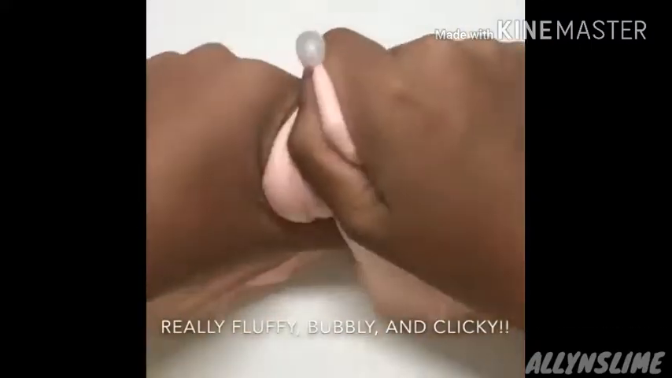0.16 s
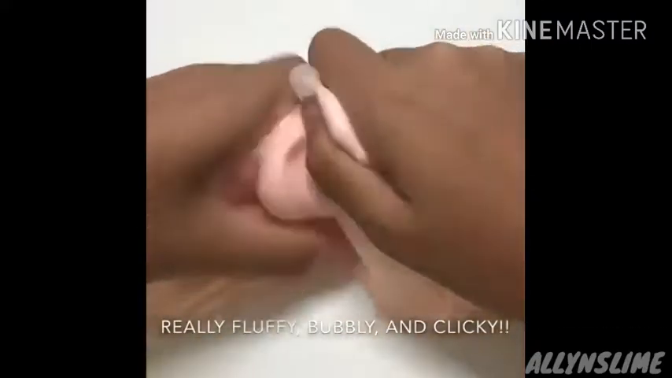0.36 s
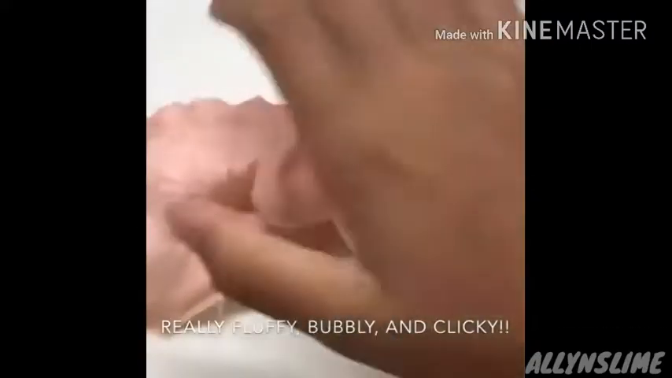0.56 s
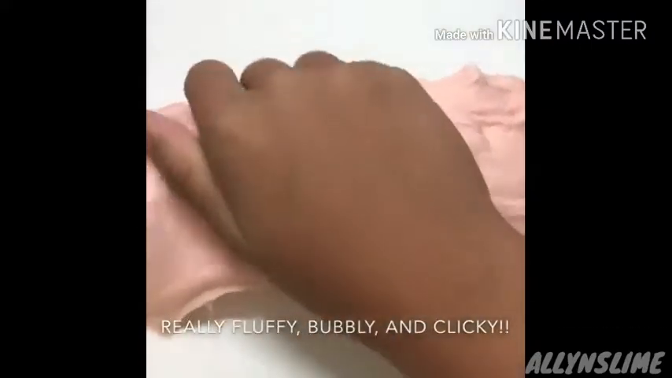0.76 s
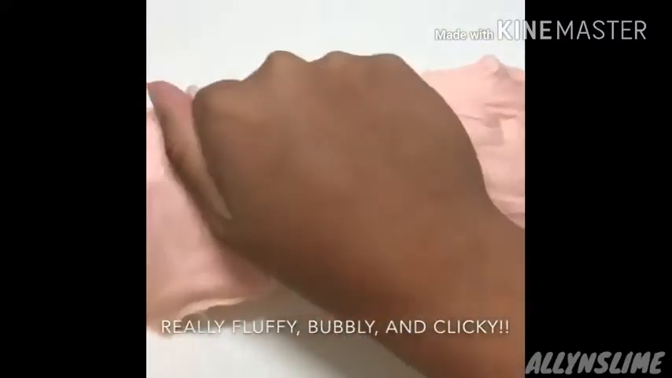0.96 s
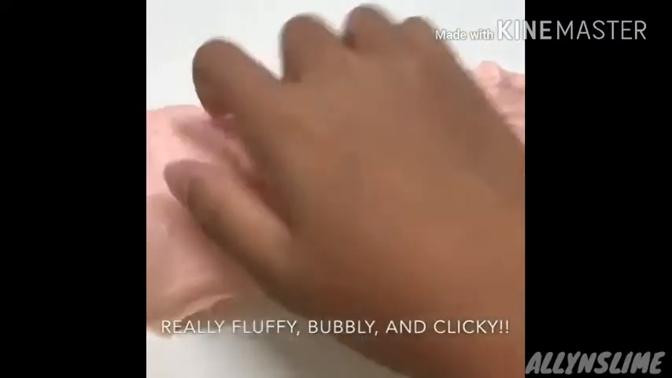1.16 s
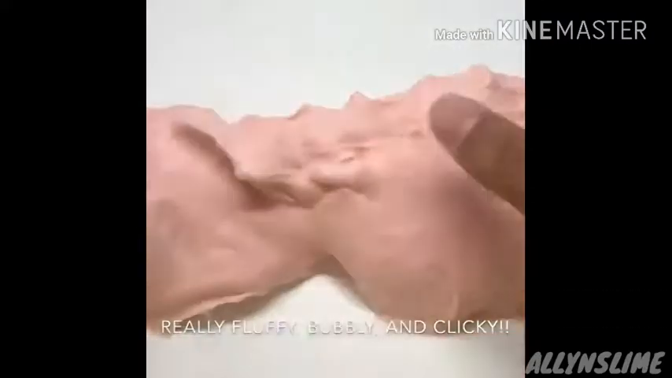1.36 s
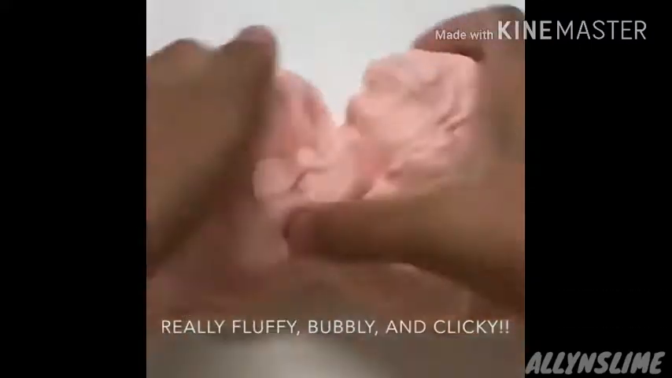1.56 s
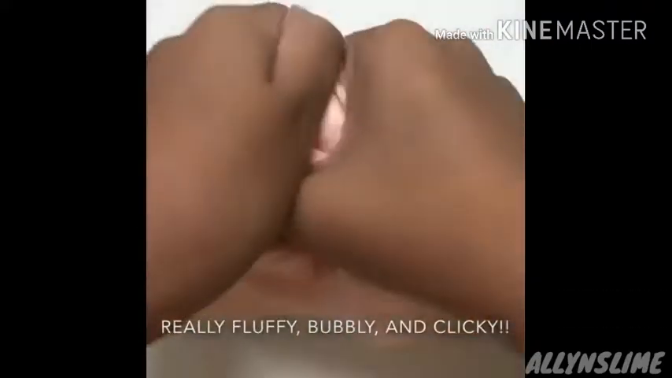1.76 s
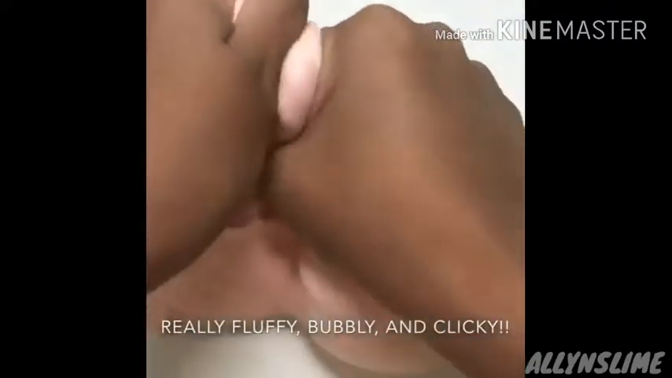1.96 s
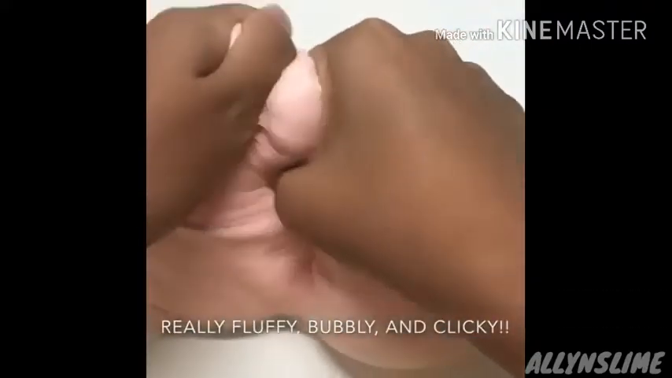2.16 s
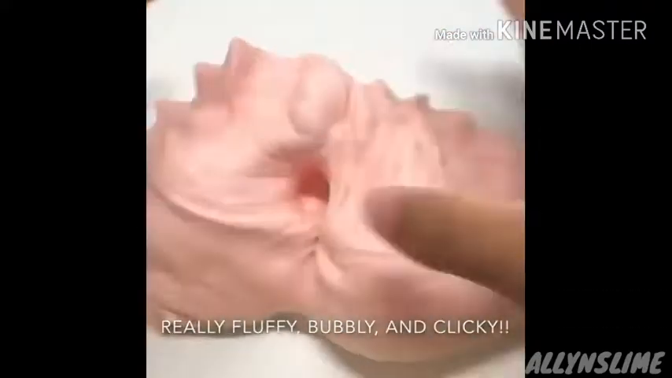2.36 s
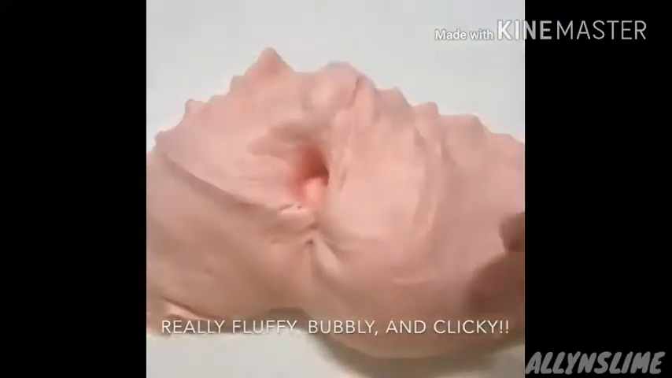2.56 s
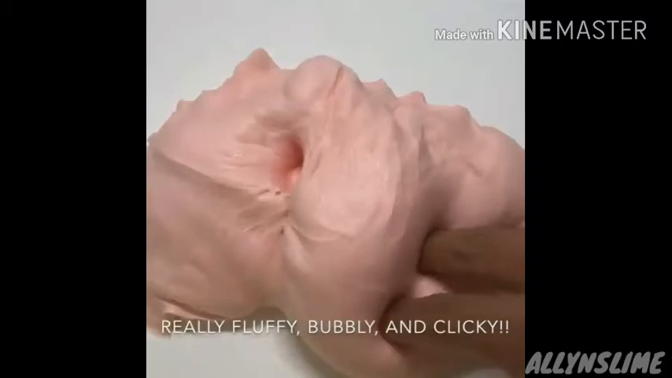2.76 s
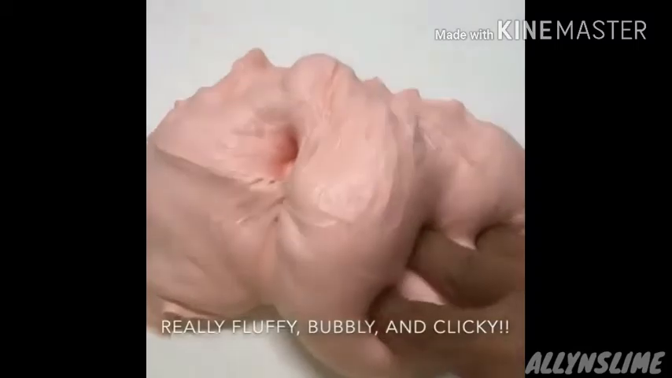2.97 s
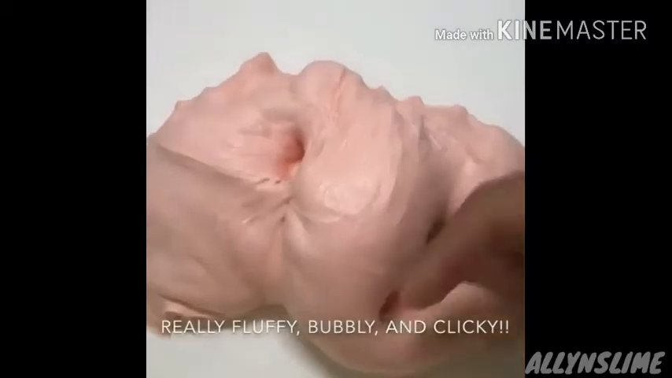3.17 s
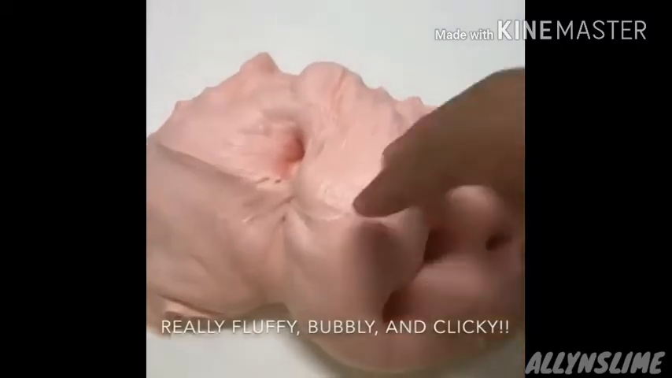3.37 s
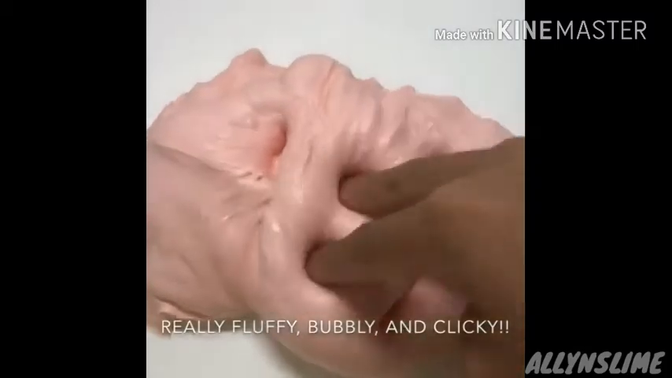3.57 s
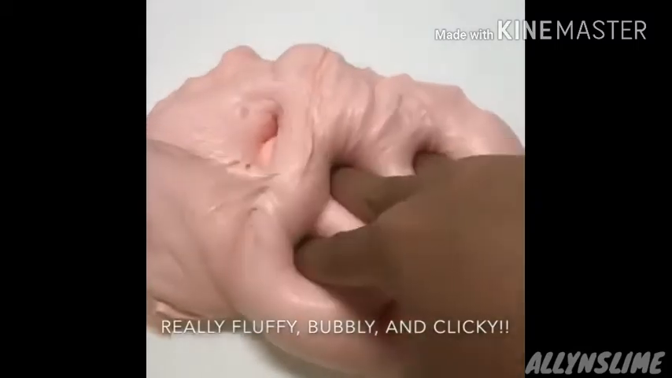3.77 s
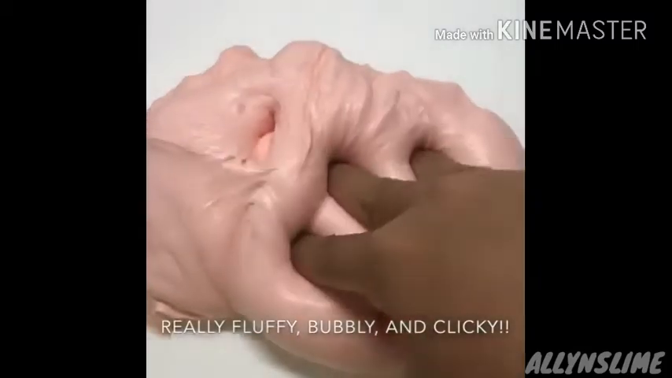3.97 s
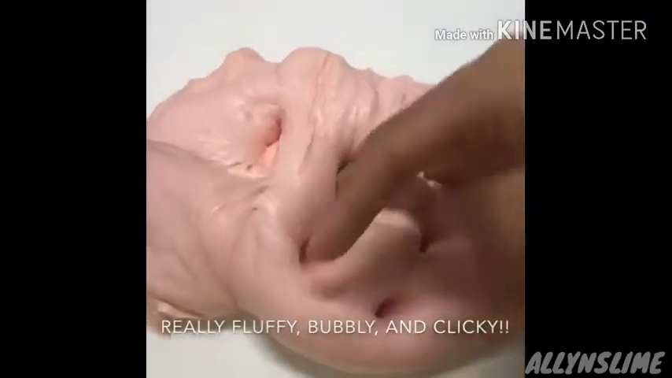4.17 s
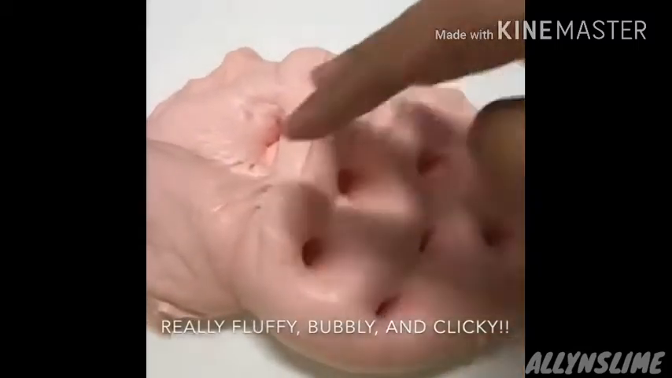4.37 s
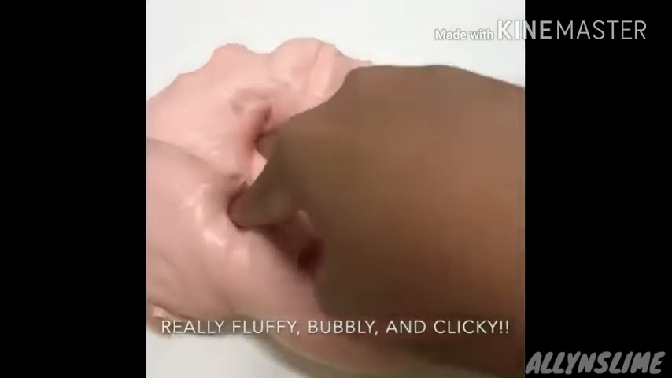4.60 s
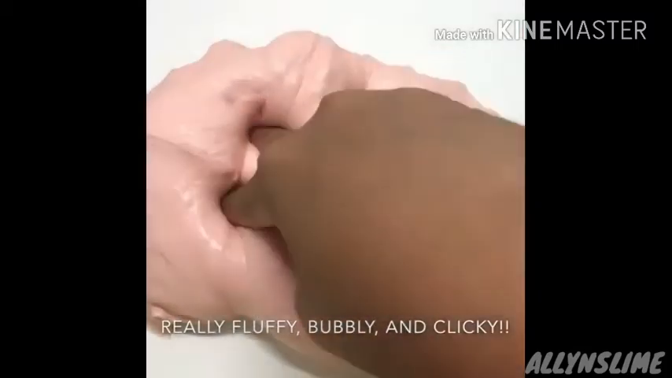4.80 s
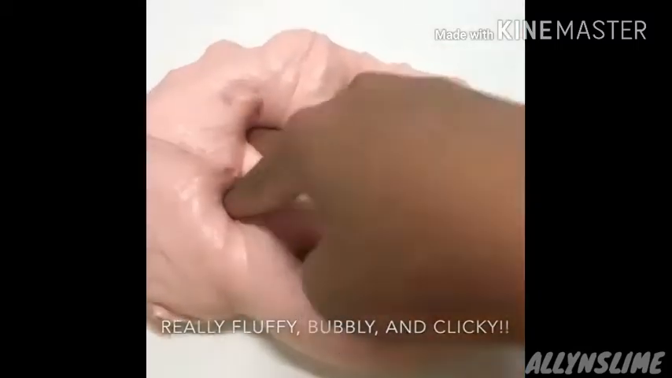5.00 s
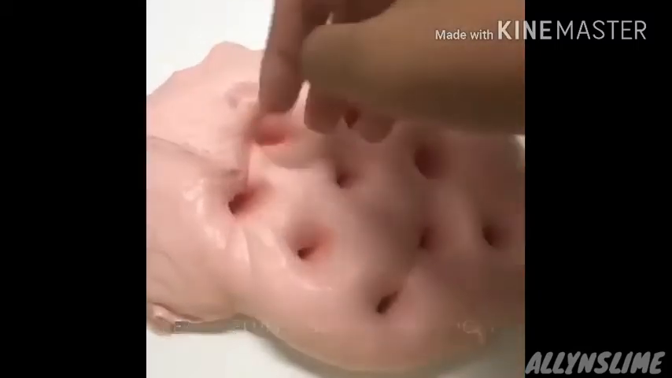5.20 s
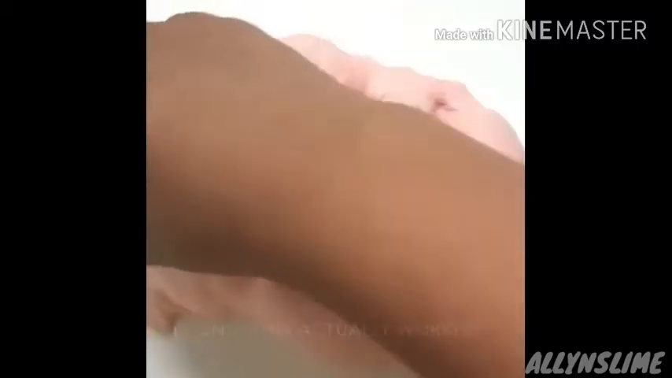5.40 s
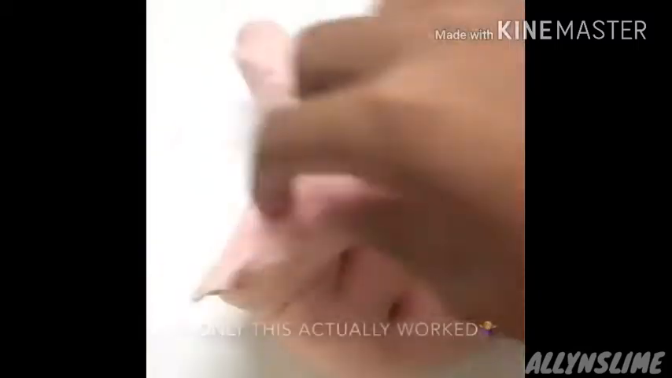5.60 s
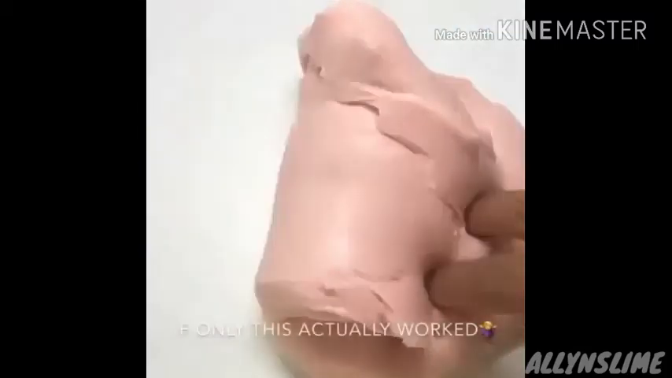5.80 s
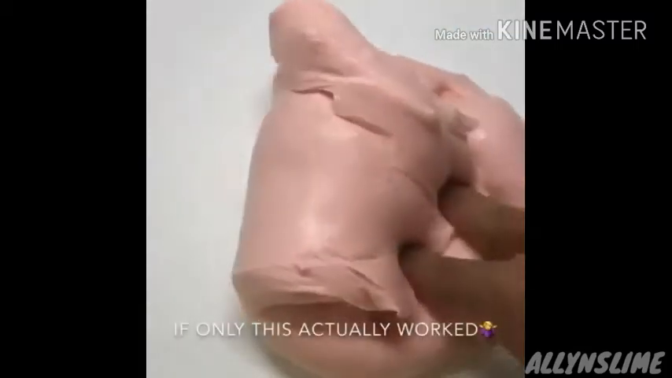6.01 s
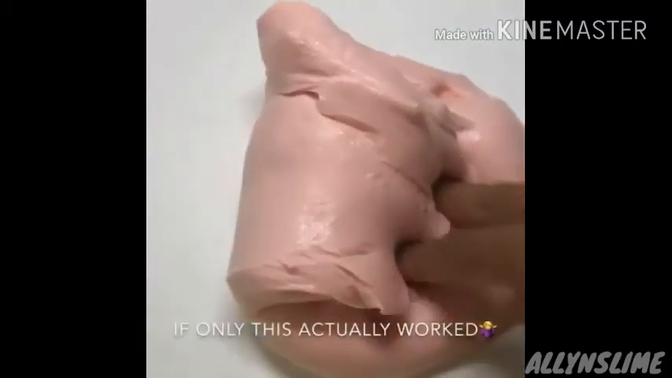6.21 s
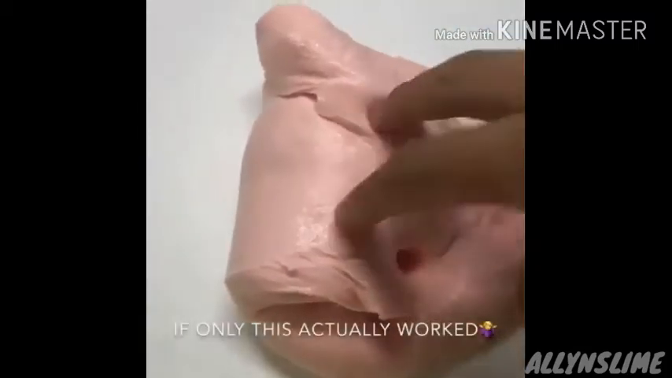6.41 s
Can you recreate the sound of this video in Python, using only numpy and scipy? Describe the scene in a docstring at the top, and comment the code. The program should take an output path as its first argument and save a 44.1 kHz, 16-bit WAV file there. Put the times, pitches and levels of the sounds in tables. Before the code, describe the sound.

Hands work foamy slime on a table, close to a small microphone in a quiet room with faint hiss. Soft fizzing and wet squelching swell with every touch. A few small pops come around 0.2 seconds, then a crackly squeeze near 0.6. Sharp, loud bubble snaps land at 1.0 and 1.1 seconds, followed by a softer squish. A quick run of pops fills 1.9 to 2.3 seconds, strongest near 2.15, and a fizzy squelch follows at 2.4. After a lull, fingers poke the slime: three crisp pops around 3.3 to 3.4, rounder plops at 4.3 with a soft table bump, and more at 5.2 to 5.4, each group trailed by a tiny gurgle as the holes close. Faint crackling continues until a last plop, low bump and short gurgle at about 6.4 seconds.

```python
"""Soft fizzing and squelching dotted with sharp little pops: hands squeeze, fold and poke a heap of foamy
slime on a table, close to a small microphone in a quiet room. Tiny foam cells crackle and wet folds slip
over each other, swelling with every touch. Trapped air pockets burst with a snap and a short ring, finger
holes plop as they open and gurgle as they close, and now and then the heap softly bumps the table."""
import sys
import numpy as np
from scipy import signal
from scipy.fft import rfft, irfft
from scipy.io import wavfile
from scipy.ndimage import uniform_filter1d

SR = 44100
rng = np.random.default_rng(int(sys.argv[2]) if len(sys.argv) > 2 else 0)


def dump_mix(stems):
    """Bounce the given channels to the path in sys.argv[1] as a 16-bit WAV at rate SR."""
    frames = np.atleast_2d(stems).T  # one column per channel
    limited = np.clip(frames, -1, 1)  # hard clip at full scale
    pcm = np.round(limited * 32767).astype(np.int16)
    wavfile.write(sys.argv[1], SR, pcm)


N = 284445


def gain_of(db):
    """Decibels to an amplitude factor."""
    return 10 ** (np.asarray(db) / 20)


def unit_rms(x):
    """Scales a signal to rms 1."""
    return x / np.sqrt(np.mean(x ** 2) + 1e-20)


def curve_at(points, hz):
    """Reads a curve of (Hz, value) points on a log-frequency axis."""
    point_hz, value = np.transpose(points)
    return np.interp(np.log(hz + 1), np.log(point_hz + 1), value)


def coloured(x, eq):
    """Shapes x with an EQ curve, at rms 1. Each row of eq: frequency in Hz, relative level in dB."""
    gains = gain_of(curve_at(eq, np.fft.rfftfreq(len(x), 1 / SR)))
    return unit_rms(irfft(rfft(x) * gains, len(x)))


def add(mix, start_s, sound):
    """Mixes a sound in at start_s."""
    part = mix[round(start_s * SR):][:len(sound)]
    part += sound[:len(part)]


def resonate(x, hz, width_hz):
    """A moving resonance: shifts the pitch curve hz down to zero, smooths, and shifts back."""
    carrier = np.exp(2j * np.pi * np.cumsum(hz) / SR)
    pole = np.exp(-np.pi * width_hz / SR)
    return 2 * (carrier * signal.lfilter([1 - pole], [1, -pole], x / carrier)).real


def grains(per_s, spread_db):
    """Random train of tiny clicks, most small and a few large."""
    size = gain_of(spread_db * np.minimum(rng.exponential(1, N), 5)) * rng.standard_normal(N)
    return size * (rng.random(N) < per_s / SR)


def burst(t, rise_s, t60):
    """Envelope that swells ever faster to a sharp peak of 1, then falls 60 dB in t60 seconds."""
    return np.where(t < rise_s, np.minimum(t / rise_s, 1) ** 2.5, gain_of(-60 * (t - rise_s) / t60))


def room_tone():
    """Steady hiss of room and microphone, with a faint mains buzz."""
    # Colour of the hiss. Each row: frequency in Hz, relative level in dB.
    hiss_eq = [(20, -31.5), (60, -10.5), (120, 0), (300, -16), (630, -3.5), (1200, -5.5), (2500, -4.5),
               (5000, -7), (6300, -11.5), (8000, -29.5), (10000, -39.5)]
    # Partials of the buzz. Each row: frequency in Hz, rms level in dB.
    mains_partials = [(50, -90), (150, -86), (250, -82.5), (500, -88), (700, -86), (900, -91),
                      (1150, -91.5), (1500, -84.5)]
    t = np.arange(N) / SR
    buzz = sum(gain_of(db) * np.sqrt(2) * np.sin(2 * np.pi * (hz * t + rng.random()))
               for hz, db in mains_partials)
    return gain_of(-70.5) * coloured(rng.standard_normal(N), hiss_eq) + buzz


def kneading():
    """Envelopes of small cells, large cells and wet folds: the settling and every crush add in power."""
    # The heap settling between touches. Each row: time in seconds, fizz in dB, squelch in dB.
    settling = [(0, -56.5, -71), (.1, -66, -68), (.5, -67, -72), (.93, -76, -77), (1.3, -71, -63.5),
                (1.55, -65.5, -71), (1.92, -74, -69.5), (2.58, -60, -63.5), (2.83, -80, -79),
                (2.9, -71.5, -72.5), (2.969, -85, -75), (3.1, -87, -82), (3.15, -76, -74),
                (3.5, -64.5, -76), (3.62, -68.5, -72), (3.72, -66, -74), (3.78, -76, -79), (3.93, -87, -80),
                (4.02, -72.5, -79), (4.119, -82, -80), (4.501, -68, -71.5), (5.151, -80, -82),
                (5.42, -71.5, -74.5), (5.52, -75, -72), (5.949, -74.5, -76), (6.17, -75, -75),
                (6.27, -84, -77.5), (6.45, -73, -79)]
    # Foam giving way under a finger or round a burst pocket. Each row: peak time, rise and hold in
    # seconds, fall in dB per second, fizz and squelch in dB, brightness (small over large cells) in dB.
    crushes = [(0.162, .012, 0.0055, 699, -48, -58, -2.5), (.247, .01, .002, 578, -36, -43.5, -11.5),
               (.29, .015, .02, 234, -52, -63, -2.5), (.338, 0.055, .006, 401, -47.5, -58, -2.5),
               (.585, .09, 0.025, 172, -37, -44, 0), (.76, .1, .05, 401, -63.5, -71, 1.5),
               (1.046, 0.036, .03, 249.5, -45, -55.5, -7.5), (1.122, 0.077, .01, 298.5, -43, -60, 3.5),
               (1.138, .015, 0.0022, 194, -31.5, -46, 3.1), (1.337, .06, .03, 390.5, -42, -46.5, -5),
               (1.68, .3, .085, 111, -54, -63, -1.7), (1.941, .015, .002, 39, -56, -58.5, 4),
               (2.062, .01, .002, 260, -31.5, -48.5, 9), (2.163, .03, .002, 149.5, -35.5, -43.5, -2),
               (2.365, .04, .015, 297.5, -53, -62, -4.5), (2.409, .07, 0.077, 255, -41.5, -46.5, -0.5),
               (3.321, .015, .002, 330, -37.5, -41.5, 14), (3.4, .03, .005, 172, -51, -50.5, -7),
               (4.302, .012, 0.0022, 647, -41.5, -41, -3.5), (4.354, .02, 0.0018, 189, -45.5, -46.5, -2.5),
               (4.45, .06, .01, 201.5, -57.5, -64.5, 4), (4.725, .04, .002, 250.5, -56.5, -57, -9.5),
               (4.846, .15, .002, 78.5, -60, -65, -4.5), (5.25, .012, .002, 700, -47, -36, 6),
               (5.29, .06, .002, 108.5, -48, -50, 1), (5.355, .02, 0.0018, 230.5, -53.5, -74, -8),
               (5.575, .04, 0.014, 100, -63, -63.5, 7.5), (5.68, .1, .025, 148.5, -55, -64, -1),
               (5.8, .15, .03, 110.5, -61.5, -68.5, 3.5), (6.381, .02, .03, 52.5, -51.5, -73, 2),
               (6.449, .1, .002, 100, -50.5, -46, -15)]
    t = np.arange(0, N + 20, 20) / SR
    settle_bright_db, climb_db = -.5, 30
    times, fizz_db, squelch_db = np.transpose(settling)
    layers = [(np.interp(t, times, fizz_db), np.interp(t, times, squelch_db), settle_bright_db)]
    for peak_s, rise_s, hold_s, fall_db_per_s, fizz_db, squelch_db, bright_db in crushes:
        attack_db = climb_db * np.minimum((t - peak_s) / rise_s, 0)
        shape_db = attack_db - fall_db_per_s * np.maximum(t - peak_s - hold_s, 0)
        layers.append((fizz_db + shape_db, squelch_db + shape_db, bright_db))
    small, large, folds = np.zeros((3, len(t)))
    for fizz_db, squelch_db, bright_db in layers:
        small += gain_of(2 * fizz_db) / (1 + gain_of(-2 * bright_db))
        large += gain_of(2 * fizz_db) / (1 + gain_of(2 * bright_db))
        folds += gain_of(2 * squelch_db)
    return [np.interp(np.arange(N) / SR, t, np.sqrt(power)) for power in (small, large, folds)]


def foam():
    """Countless cells crackle (fizz) while wet folds slip over each other (squelch)."""
    # Bright small cells, duller large cells, low wet folds. Each row: frequency in Hz, relative dB.
    small_cell_eq = [(1500, -27), (2600, -16), (3500, -1), (5500, 1.5), (6800, -6), (8000, -26),
                     (10000, -37.5)]
    large_cell_eq = [(500, -20.5), (1000, 0), (1800, -1), (2800, -4), (3800, -11.5), (6000, -50)]
    fold_eq = [(40, -40.5), (110, -11), (200, -1), (400, -3), (1000, -5.5), (1500, -19), (3000, -38)]
    small, large, folds = kneading()
    fizz_level = np.hypot(small, large)
    cells = grains(per_s=12000, spread_db=1.5)
    fizz = (small * coloured(cells, small_cell_eq) + large * coloured(cells, large_cell_eq)) / fizz_level
    # folds open and shut, so a hollow tint wanders through the fizz
    wander = unit_rms(uniform_filter1d(uniform_filter1d(rng.standard_normal(N), size=3000), size=3000))
    hollow = unit_rms(resonate(fizz, 3100 * np.exp(.3 * wander), width_hz=1000))
    squelch = coloured(grains(per_s=3000, spread_db=2.2), fold_eq)
    return fizz_level * unit_rms(fizz + .5 * hollow) + folds * squelch


def pocket_ring(t, noise, hz, rise_s, t60):
    """A burst pocket rings, dropping quickly onto its pitch, ragged because the torn film flaps."""
    pitch = hz * (1 + .16 * np.exp(-t / .00033))
    width_hz = .34 * hz
    flutter = unit_rms(resonate(resonate(noise, pitch, width_hz), pitch, width_hz))
    phase = 2 * np.pi * np.cumsum(pitch) / SR
    tone = np.cos(phase - phase[round(rise_s * SR)])  # crests together with the envelope
    return (tone + .45 * flutter) * burst(t, rise_s, t60)


def film_snap(t, noise, rise_s):
    """The film over a pocket tears: a rasp around one sharp crack."""
    # Colour of the tear. Each row: frequency in Hz, relative level in dB.
    snap_eq = [(400, -24), (1200, -9), (2500, -1), (4000, 0.5), (6300, -3), (7500, -14.5), (9500, -34.5),
               (11000, -66.5)]
    crack = coloured(signal.unit_impulse(len(t), round(rise_s * SR)), snap_eq)
    rasp = coloured(noise, snap_eq) * burst(t, rise_s, t60=.0055)
    return rasp + 1.3 * crack / crack.max()


def hole_plop(t, hz, t60):
    """A hole opens with a plop: a sine that dives about an octave onto hz."""
    pitch = hz * (1 + 1.1 * np.exp(-t / .0013))
    return np.sin(2 * np.pi * np.cumsum(pitch) / SR) * burst(t, rise_s=.0037, t60=t60)


def pops():
    """Air pockets burst: the film snaps, the pocket rings at two pitches, the hole plops."""
    # Each row is one pocket: start in seconds; pitch of first ring, second ring and plop in Hz; level of
    # first ring, second ring, plop and snap in dB; the plop's 60 dB decay time in seconds.
    pockets = [(.172, 780, 2470, 460, -34, -36, -41.5, -31, 0.018),
               (.242, 1150, 2080, 347, -18.5, -35, -31.5, -48, 0.011),
               (0.311, 1670, 2520, 290, -44.5, -43, -50, -42, 0.031),
               (.365, 1510, 2450, 600, -33, -39.5, -36, -36, 0.0053),
               (.546, 1000, 4500, 302, -45, -52.5, -36, -32, 0.062),
               (1.0319, 1630, 2450, 684, -13, -12.5, -37, -38, 0.025),
               (1.1196, 1890, 2550, 735, -25.5, -22, -31, -16, 0.013),
               (1.1318, 1650, 3100, 520, -9, -2.5, -28, -11.5, .012),
               (1.135, 2430, 2750, 610, -19.5, -16.5, -41, -35.5, 0.0081),
               (1.33, 921, 2440, 550, -34, -27, -44, -43, 0.036),
               (1.562, 820, 4360, 309, -45, -59, -56, -52, 0.029),
               (1.929, 1350, 5050, 600, -49, -34.5, -47.5, -30.5, .015),
               (1.967, 1509, 3460, 597, -38.5, -39.5, -50, -26, .015),
               (2.012, 1060, 5800, 650, -33.5, -36.5, -40, -19.5, 0.036),
               (2.045, 1290, 5170, 694, -29, -31.5, -43, -27, 0.019),
               (2.06, 1710, 3140, 255, -27, -17.5, -35.5, -11, 0.041),
               (2.134, 1160, 4200, 294, -8.5, -18, -11.5, -30.5, 0.0045),
               (2.161, 1093, 4120, 343, -10.5, -23.5, -20, -12.5, 0.0079),
               (2.224, 1390, 4200, 360, -27.5, -27.5, -42, -27, 0.035),
               (2.252, 850, 3770, 734, -40, -42, -45, -31, 0.035),
               (2.399, 846, 3040, 330, -32.5, -30, -40, -33.5, 0.039),
               (3.312, 1080, 4900, 594, -31, -20, -33.5, -19, 0.031),
               (3.341, 1010, 3850, 288, -23, -24, -32, -10, 0.046),
               (3.389, 1090, 5830, 516, -17, -26.5, -26.5, -17, 0.016),
               (4.245, 1456, 5110, 279, -84, -58, -75.5, -50.5, 0.029),
               (4.296, 621, 957, 286, -23, -29, -27, -19, 0.075),
               (4.344, 1250, 5930, 526, -22, -14.5, -27, -17, .025),
               (4.712, 1812, 2710, 600, -41, -55.5, -40, -44.5, 0.016),
               (5.24, 1267, 654, 350, -15.5, -15, -18.5, -17.5, .025),
               (5.339, 690, 2700, 345, -20, -41, -19.5, -33, 0.029),
               (5.57, 1414, 4430, 380, -52, -47.5, -55, -50, 0.026),
               (6.174, 1317, 4990, 690, -61, -57, -67.5, -49.5, 0.037),
               (6.372, 950, 645, 305, -23, -33.5, -20.5, -25, 0.0099)]
    t, rise_s = np.arange(4096) / SR, .003
    low_cut = signal.butter(4, 180, "high", fs=SR, output="sos")  # so small a source has no deep bass
    track = np.zeros(N)
    for start_s, first_hz, second_hz, plop_hz, first_db, second_db, plop_db, snap_db, plop_t60 in pockets:
        noise = rng.standard_normal(len(t))
        first = gain_of(first_db) * pocket_ring(t, noise, first_hz, rise_s, t60=.0097)
        second = gain_of(second_db) * pocket_ring(t, noise, second_hz, rise_s, t60=.008)
        snap = gain_of(snap_db) * film_snap(t, noise[::-1], rise_s)
        plop = gain_of(plop_db) * hole_plop(t, plop_hz, plop_t60)
        add(track, start_s, signal.sosfilt(low_cut, first + second + snap + plop))
    return track


def room_reverb(x):
    """Sparse reflections of random sign, each band dying away at its own speed."""
    # The room's decay. Each row: frequency in Hz, time to fall 60 dB in seconds.
    decay_times = [(200, 0.1), (1000, 0.32), (3000, 0.39), (7000, 0.29)]
    taps = np.zeros(SR // 2)
    slots = np.arange(200, len(taps) - 20, 20)
    taps[slots + rng.integers(0, 20, len(slots))] = rng.choice([-1., 1.], len(slots))
    hz, t, bands = signal.stft(taps, SR, nperseg=256)
    decay = gain_of(-60 * t / curve_at(decay_times, hz)[:, None])
    tail = signal.istft(bands * decay, SR, nperseg=256)[1]
    return signal.fftconvolve(x, tail / np.linalg.norm(tail))[:N]


def gurgles():
    """Air leaves a closing finger hole: noise in one narrow resonance, sinking in pitch and level."""
    # Each row is one hole: start in seconds, length in seconds, level before the fade in dB, pitch in Hz.
    holes = [(0.682, 0.022, -46, 890), (2.402, 0.026, -36.5, 294), (2.473, 0.048, -51.5, 310),
             (3.347, 0.086, -45.5, 345), (4.354, 0.041, -42, 373), (4.383, .02, -36.5, 323),
             (4.398, 0.052, -51.5, 325), (5.261, 0.13, -44.5, 310), (5.34, .07, -48.5, 328),
             (6.383, 0.14, -41.5, 300)]
    pitch_sag, fade_db = .03, -4.5
    track = np.zeros(N)
    for start_s, length_s, db, hz in holes:
        progress = np.linspace(0, 1, round(length_s * SR))
        pitch = hz * (1 - pitch_sag * (progress - .5))
        noise = rng.standard_normal(SR // 5)[:len(progress)]
        air = unit_rms(resonate(resonate(noise, pitch, width_hz=87), pitch, width_hz=47))
        envelope = gain_of(db + fade_db * progress) * signal.windows.tukey(len(progress), .5)
        add(track, start_s, air * envelope)
    return track


def table_bumps():
    """The heap pushes into the table top with a soft, low thud."""
    # Each row is one push: start in seconds, peak level in dB, pitch in Hz.
    pushes = [(1.336, -59, 139), (2.141, -73, 96.9), (3.329, -68.5, 145), (4.297, -44.5, 70.0),
              (4.399, -53, 74.3), (5.253, -62.5, 146.6), (5.351, -66, 110.6), (6.38, -44.5, 98)]
    t = np.arange(8000) / SR
    envelope = burst(t, rise_s=.008, t60=.09)
    track = np.zeros(N)
    for start_s, db, hz in pushes:
        add(track, start_s, gain_of(db) * np.sin(2 * np.pi * hz * t) * envelope)
    return track


def scene():
    """Mono mix: pops with a touch of room, over dry gurgles, bumps, foam and room tone."""
    popping = pops()
    holes_and_bumps = gurgles() + table_bumps()
    return (popping + gain_of(-19) * room_reverb(popping) + holes_and_bumps + foam() + room_tone())[None]


def record(dry):
    """The microphone rolls off the top; the converter adds a tiny offset, clips and limits the band."""
    mic_top_hz, band_limit_hz, dc_offset = 9600, 16677, .0013
    mic_filter = signal.firwin(95, mic_top_hz, window=("kaiser", 9), fs=SR)
    band_filter = signal.firwin(511, band_limit_hz, window=("kaiser", 9), fs=SR)
    heard = signal.oaconvolve(dry, mic_filter[None], "same")
    clipped = np.clip(heard + dc_offset, -.92, .97)
    return signal.oaconvolve(clipped, band_filter[None], "same")


dry = scene()
out = record(dry)
dump_mix(out)
```